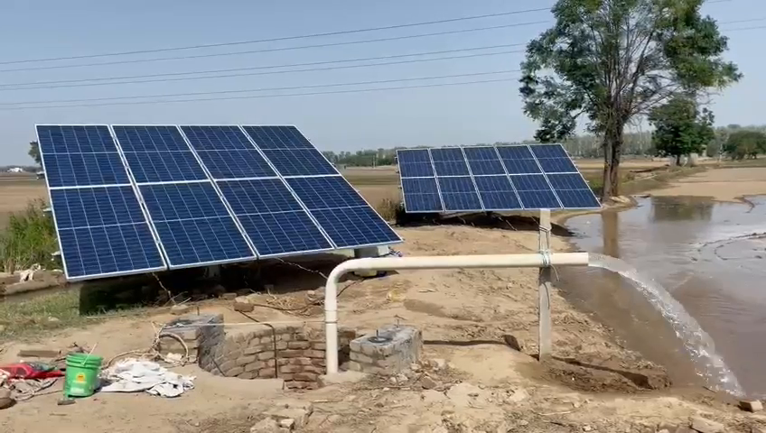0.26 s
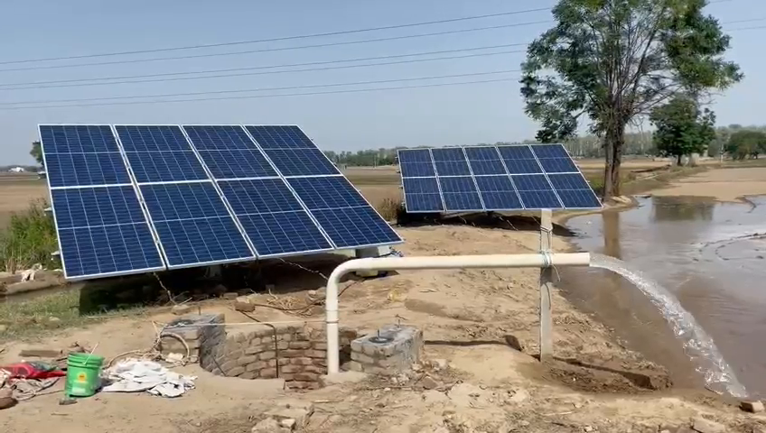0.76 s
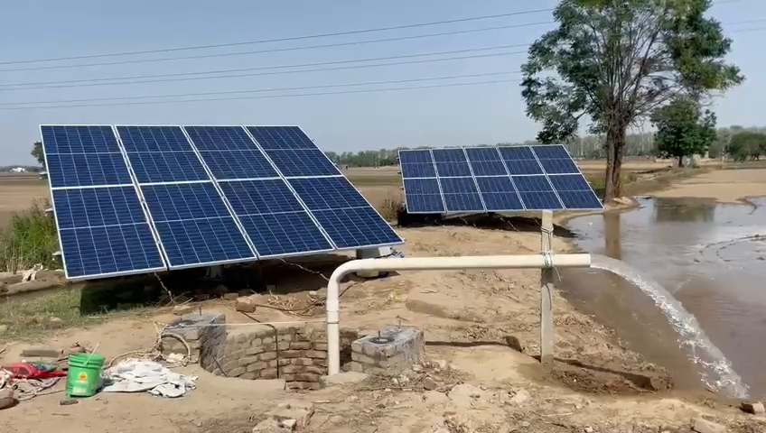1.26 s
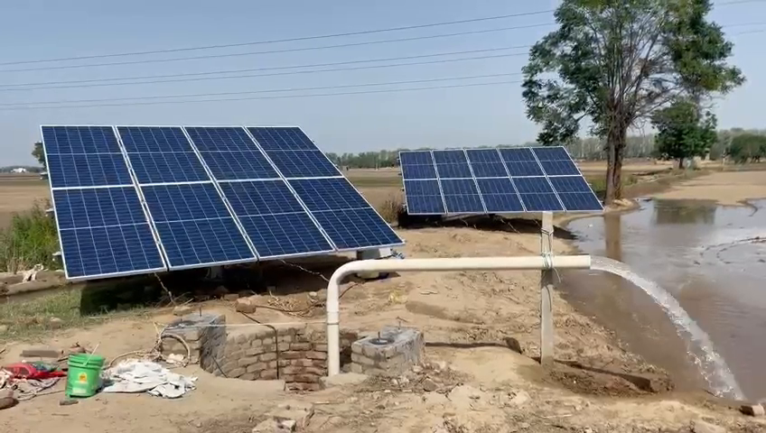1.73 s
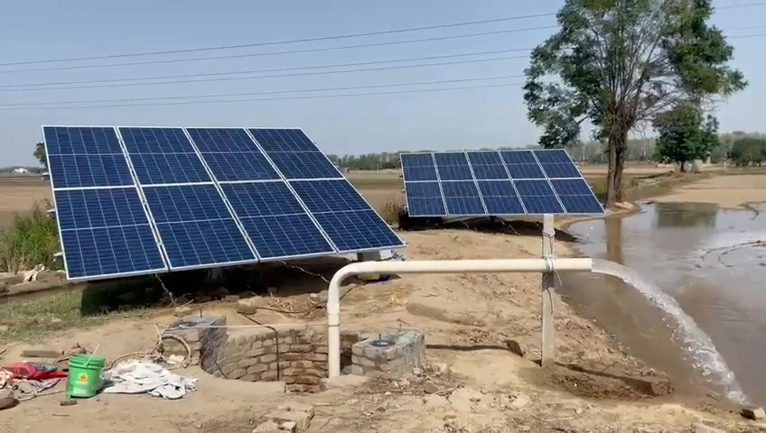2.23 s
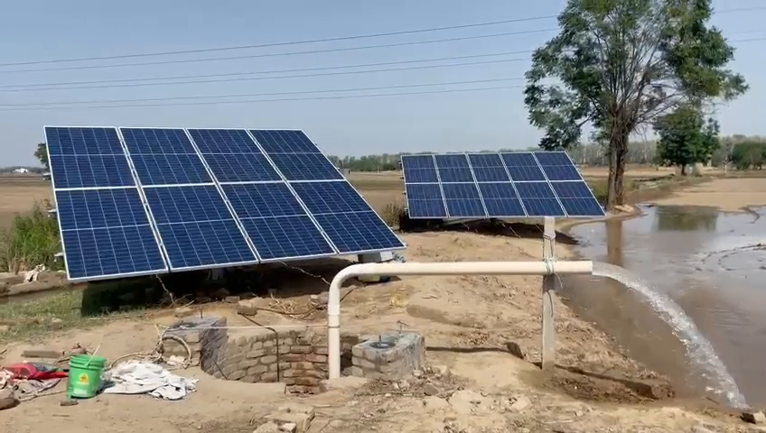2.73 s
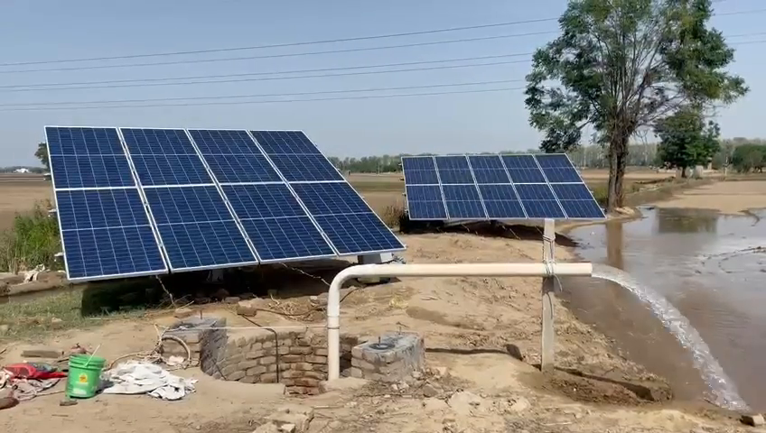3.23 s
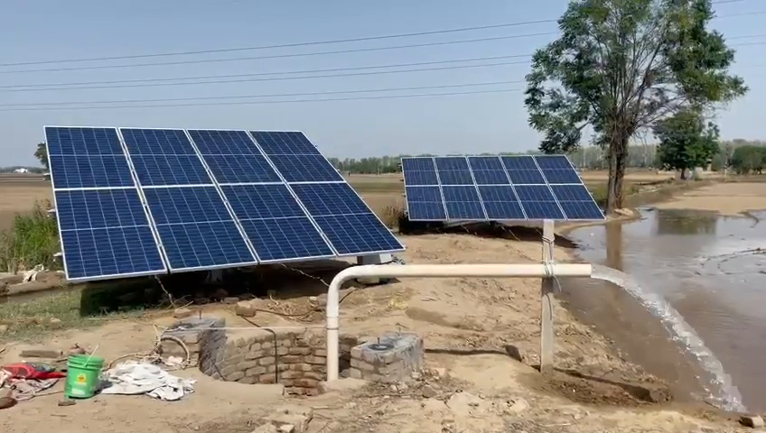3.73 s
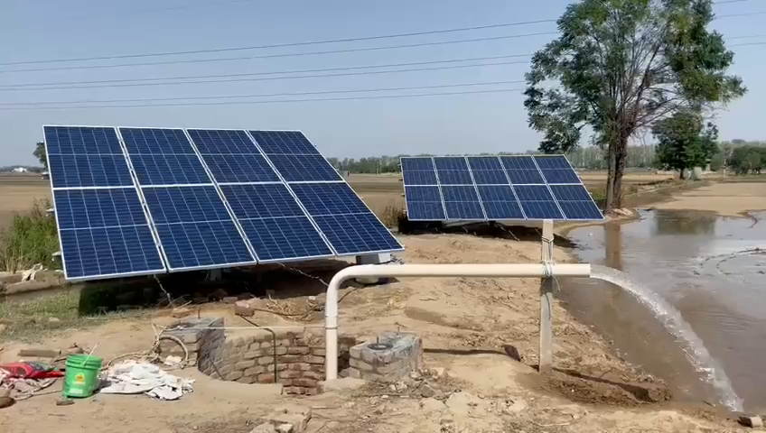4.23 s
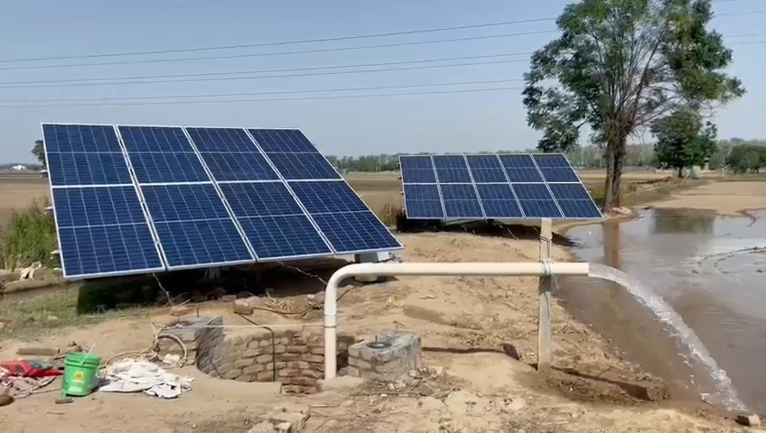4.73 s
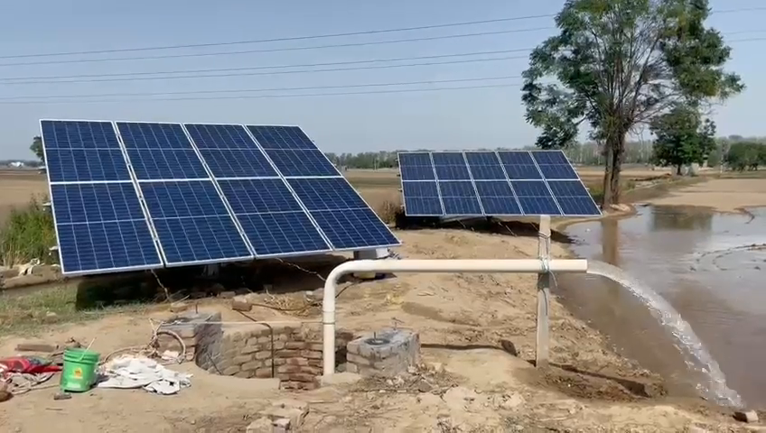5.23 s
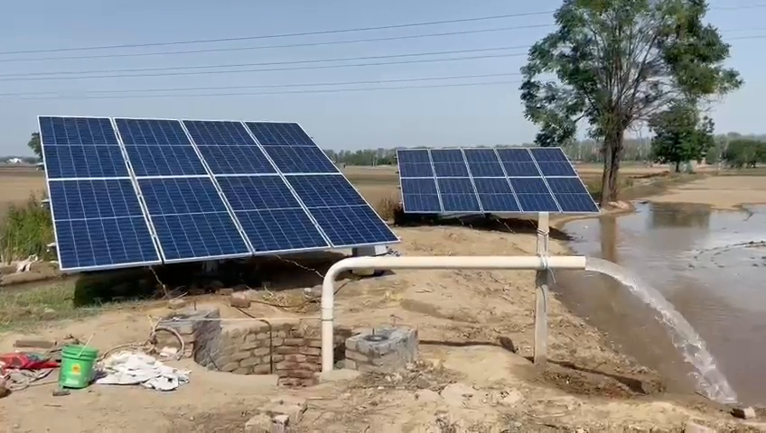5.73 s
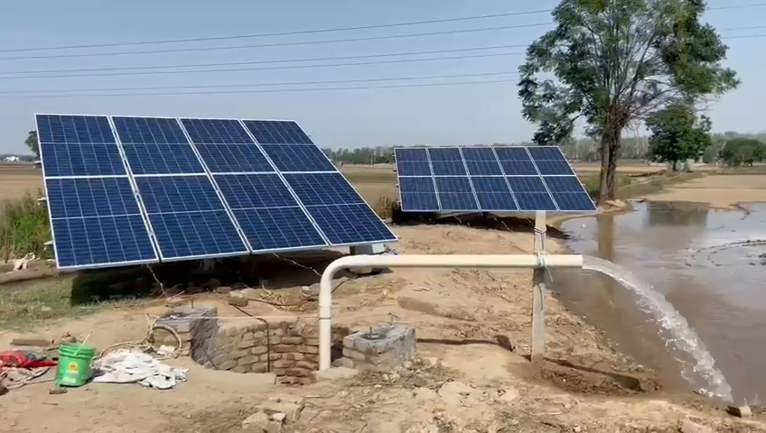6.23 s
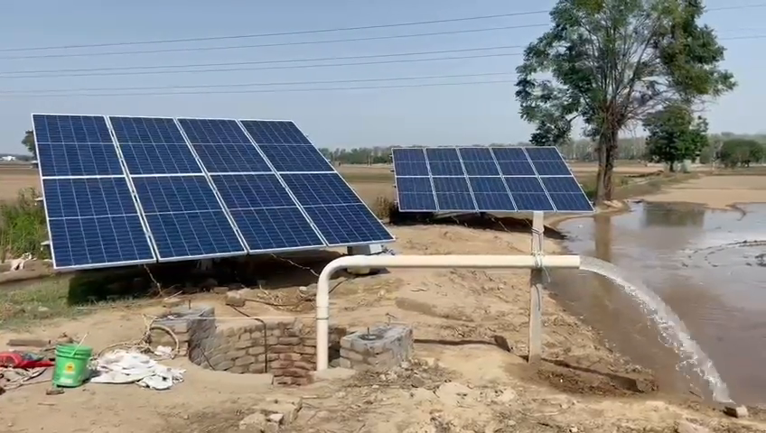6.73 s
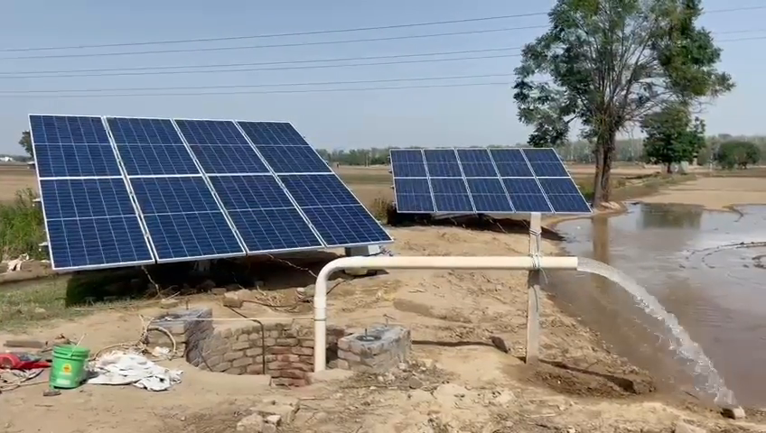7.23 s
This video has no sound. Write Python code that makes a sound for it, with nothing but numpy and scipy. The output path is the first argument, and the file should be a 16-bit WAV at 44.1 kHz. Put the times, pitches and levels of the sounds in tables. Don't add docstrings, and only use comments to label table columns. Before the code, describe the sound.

A thick jet pours continuously from a pump pipe into a shallow flooded field. The plunge is a dense, bubbly rush with white spray, random plops and low gurgles. Wind buffets the phone microphone in low rumbles and dull thumps, lighter around three seconds, busiest near five to six, with a very hard thump just before seven. A very faint high electrical whine hides beneath. Open outdoors, no echoing room, stereo, slightly duller on the right.

```python
import sys
import numpy as np
from scipy import signal
from scipy.fft import rfft, irfft
from scipy.io import wavfile
from scipy.ndimage import uniform_filter1d

SR = 44100
rng = np.random.default_rng(int(sys.argv[2]) if len(sys.argv) > 2 else 0)


def to_wav(sig):
    pcm = np.clip(np.atleast_2d(sig), -1, 1) * 32767
    pcm = np.round(pcm).astype(np.int16)
    wavfile.write(sys.argv[1], SR, pcm.T)


def field_ratio(decibels):
    return 10 ** (np.asarray(decibels, dtype=float) / 20)


N = 329427
T = np.arange(N) / SR
HZ = np.fft.rfftfreq(N, 1 / SR)

# (pitch [Hz], left level [dB], right level [dB])
DRIVE_TONES = [(3788.5, -73, -85), (3826.2, -74, -84), (3960.8, -77, -84), (4038.8, -72, -75),
               (4116.9, -70, -74), (4194.9, -75, -80), (7389.9, -76, -78), (7922.3, -70, -70),
               (8000, -59, -59), (8233.8, -78, -78), (8532.5, -77, -77), (8610.6, -83, -83)]

# (time [s], level [dB])
GUST = [(0, -36.5), (.3, -48), (.9, -47), (1.3, -41.5), (1.8, -41), (2.2, -41), (2.55, -51.5), (3.2, -42),
        (3.95, -46.5), (4.45, -39.5), (4.86, -44), (4.95, -32), (5.4, -41.5), (5.9, -38.5), (6.3, -45),
        (6.8, -40), (7.25, -40.5), (7.47, -36.5)]
# (frequency [Hz], density [dB per Hz])
LOW_WIND = [(15, -33), (32, -9), (58, 2.5), (100, -1), (140, -6), (250, -62), (400, -100)]
HIGH_WIND = [(60, -22), (120, -4.5), (170, -2), (300, -10.5), (450, -10), (800, -51.5)]
EDDY_WIND = [(20, -14), (60, -1.5), (120, 4), (280, 0.5), (450, -11), (800, -44.5)]
# (middle [s], peak [dB], length [s])
SWIRLS = [(0.665, -40, 0.2), (2.63, -41, 0.33), (4.65, -41.5, 0.23), (5.127, -44, 0.081),
          (5.385, -46, 0.088), (1.406, -51, 0.16), (3.798, -47.5, 0.45), (4.335, -42.5, 0.066),
          (5.85, -49, 0.25), (7.406, -47, 0.066), (6.48, -42, 0.13), (6.873, -44.5, 0.27)]
# (middle [s], peak [dB], length
# [s], pitch [Hz])
SURGES = [(0.036, -31.5, 0.026, 84), (1.455, -28.5, 0.012, 71.2), (1.492, -23, 0.017, 73.6),
          (1.565, -31, 0.016, 76.1), (1.599, -28.5, 0.011, 76), (1.742, -26, 0.012, 78.8),
          (1.777, -26.5, 0.054, 82), (2.032, -30.5, 0.018, 83), (2.116, -28.5, 0.036, 64.8),
          (2.185, -30, 0.019, 90), (2.41, -34, 0.032, 101.7), (3.14, -32.5, 0.027, 85),
          (3.217, -30.5, 0.019, 93), (3.409, -34.5, 0.042, 91.3), (3.824, -25, 0.014, 86),
          (4.076, -30.5, 0.02, 106), (4.39, -34, 0.014, 95), (4.459, -29.5, 0.05, 73.3),
          (4.643, -38, 0.02, 104.7), (4.758, -35, 0.011, 86.6), (4.798, -30.5, 0.028, 80.5),
          (4.897, -35, 0.01, 115.5), (4.946, -22.5, 0.033, 80.1), (5.015, -25.5, 0.021, 64.2),
          (5.096, -29, 0.013, 82), (5.137, -27, 0.022, 80.8), (5.17, -30, 0.009, 89.4),
          (5.286, -42, 0.03, 75), (5.33, -23.5, 0.012, 83.5), (5.391, -21.5, 0.028, 93),
          (5.439, -28, 0.012, 104), (5.477, -31.5, 0.01, 110.7), (5.525, -25, 0.02, 66.5),
          (5.603, -28, 0.024, 73.4), (5.656, -34, 0.008, 85.3), (5.695, -30, 0.045, 64),
          (5.746, -31, 0.035, 66.6), (5.819, -27, 0.021, 84.9), (5.886, -40, 0.014, 121),
          (5.944, -33, 0.012, 87.3), (6.684, -30, 0.015, 75), (6.771, -27.5, 0.014, 86),
          (6.831, -22, 0.027, 76.4), (6.894, -26, 0.014, 82.5), (6.983, -31.5, 0.026, 105.4),
          (7.03, -34, 0.031, 72), (7.11, -33, 0.014, 65.8), (7.153, -29, 0.014, 94),
          (7.362, -40, 0.015, 85.4), (7.389, -24, 0.022, 89.8),
          (0.625, -40, 0.02, 84.8), (0.683, -37, 0.028, 79.6), (1.67, -31, 0.021, 83),
          (2.34, -35, 0.02, 71), (3.026, -37.5, 0.041, 75), (4.162, -36.5, 0.048, 70), (6.01, -35, .04, 70),
          (6.141, -31, .04, 70.2), (6.53, -32.5, 0.027, 83.8), (5.23, -34, 0.053, 74.6)]
# (time [s], peak [dB], pitch [Hz])
THUMPS = [(0.023, -24.5, 157), (0.105, -34, 410), (0.259, -32, 155), (0.334, -27, 380), (0.609, -32, 202),
          (0.828, -31, 272), (0.89, -27.5, 444), (1.161, -29, 196), (1.292, -26, 212), (1.373, -27.5, 218),
          (1.434, -21, 172), (1.474, -21.5, 140), (1.757, -21.5, 248), (1.783, -23, 190),
          (1.558, -26.5, 230), (1.954, -21, 356), (2.167, -27, 101), (2.382, -19.5, 287),
          (2.52, -31.5, 340), (2.64, -29.5, 140), (2.818, -26, 430), (3.125, -35, 122), (3.188, -31, 136),
          (3.254, -27, 168), (3.395, -28, 101), (3.461, -49, 243), (3.657, -25, 133), (3.695, -34, 223),
          (3.966, -29, 345), (4.256, -27.5, 205), (4.568, -27.5, 218), (3.806, -33, 102), (4.062, -51, 109),
          (4.439, -26.5, 140), (4.732, -25, 157), (4.924, -18, 201), (4.961, -43, 151), (5.029, -57, 193),
          (5.12, -48, 130), (5.165, -23.5, 150), (5.5, -36, 140), (5.643, -41, 129), (5.866, -25.5, 169),
          (6.064, -32, 184), (6.5, -27, 155), (6.89, -33, 122), (7.114, -32, 251), (5.336, -22.5, 136),
          (5.378, -16, 105), (5.718, -33, 175), (5.918, -23, 143), (6.163, -21, 252), (6.241, -22.5, 244),
          (6.804, -13, 168.5), (6.971, -26.5, 118), (7.335, -29.5, 102), (7.46, -20.5, 250)]

# (time [s], level [dB])
FLOW = [(0, -45.5), (.15, -44), (.55, -43), (1.1, -43.5), (1.6, -43.5), (2.3, -44), (2.65, -42.5),
        (2.95, -43), (3.3, -43), (3.7, -42.5), (4.2, -42.5), (4.45, -44), (4.7, -44.5), (4.9, -43.5),
        (5.45, -44), (5.95, -43), (6.3, -43), (7.47, -43)]
# (middle [s], gain over the flow [dB], length [s])
SLUGS = [(0.552, 1, 0.04), (0.782, 2, 0.058), (1.8, 0.5, 0.16), (2, 2, 0.016), (2.12, 1.5, 0.039),
         (2.332, 2.5, 0.11), (2.626, 3, 0.018), (2.768, 0.5, 0.093), (3.12, 1, 0.043), (3.62, 1, 0.11),
         (3.85, -0.5, .04), (4.555, 2, 0.059), (4.741, 3, 0.11), (5.976, 3.5, 0.043), (7.009, 1.5, 0.099),
         (7.441, 1.5, 0.018)]
# (time [s], peak [dB], pitch [Hz])
PLOPS = [(0.263, -37, 1180), (0.333, -28, 680), (0.515, -30, 824), (0.527, -24, 2960), (0.793, -35, 760),
         (0.876, -30, 1100), (1.064, -27, 780), (1.286, -25, 744), (1.421, -28, 910), (2.26, -30, 1080),
         (3.15, -25, 1640), (3.223, -26, 770), (3.612, -29, 2800), (3.667, -24, 820), (4.301, -38, 1080),
         (4.718, -27, 950), (5.539, -31, 820), (6.312, -33, 1026), (6.874, -26, 750), (6.964, -26, 900),
         (1.787, -25, 1040), (1.91, -30, 1040), (1.999, -23.5, 2170), (2.132, -21.5, 1435),
         (2.285, -33, 795), (2.617, -39, 740), (2.759, -54, 770), (3.715, -21.5, 1470),
         (3.853, -21.5, 1410), (3.921, -37, 880), (4.26, -41, 780), (4.577, -31, 1320),
         (4.964, -27.5, 1100), (5.313, -25.5, 1100), (5.898, -27, 1440), (5.989, -40, 710),
         (6.552, -31, 995), (7.435, -19, 2000), (7.438, -17, 2030), (7.442, -21, 2210),
         (7.451, -24.5, 1920)]
# (time [s], peak [dB],
# pitch [Hz])
GURGLES = [(0.054, -33, 505), (0.104, -21.5, 400), (0.142, -41, 436), (0.214, -29, 395), (0.259, -25, 340),
           (0.336, -23.5, 363), (0.561, -27, 431), (0.733, -36, 436), (0.783, -25, 458), (0.891, -30, 447),
           (0.96, -35, 450), (1.195, -38, 439), (1.477, -25, 313), (1.558, -40, 310), (1.757, -26.5, 323),
           (1.954, -28.5, 343), (2.143, -37, 428), (2.385, -24.5, 301), (2.522, -29, 330),
           (2.596, -35, 388), (2.698, -50, 342), (2.727, -32, 330), (2.822, -23.5, 444), (2.926, -32, 365),
           (2.979, -25.5, 392), (3.037, -26, 377), (3.213, -45, 345), (3.253, -33, 360), (3.463, -37, 326),
           (3.669, -51, 457), (3.832, -31, 446), (3.967, -27, 347), (4.104, -28, 356), (4.139, -31, 355),
           (4.217, -26, 367), (4.305, -22.5, 374), (4.449, -35, 331), (4.483, -23.5, 358),
           (4.536, -34, 410), (4.571, -27, 417), (4.924, -32, 304), (4.963, -40, 366), (5.246, -34, 420),
           (5.377, -29, 444), (5.468, -30, 430), (5.552, -27, 388), (5.679, -38, 417), (5.799, -48, 463),
           (6.018, -45, 334), (6.165, -31.5, 310), (6.245, -44, 306), (6.539, -25, 302), (6.601, -31, 336),
           (6.718, -26, 385), (6.801, -24, 360), (6.86, -31, 304), (6.892, -28, 370), (6.974, -29, 312),
           (7.113, -44, 312), (7.346, -26, 303),
           (0.226, -29, 1060), (0.389, -30, 1060), (0.649, -36, 700), (0.762, -29.5, 680), (1.829, -26, 880),
         (1.934, -43, 646), (1.959, -39, 750), (2.169, -46, 1160), (2.439, -30, 750), (3.386, -31.5, 740),
         (3.579, -31.5, 670), (3.941, -35, 850), (4.446, -26, 767), (4.679, -28, 850), (4.924, -29, 767),
         (5.962, -33, 972), (6.289, -36, 820), (6.559, -34, 740), (6.629, -41, 790), (6.989, -37, 805),
         (7.181, -29, 940), (7.442, -41, 2130)]
# (frequency [Hz], density [dB per Hz])
LEFT_PORT = [(200, 3), (480, -1), (580, -6.5), (800, -8), (1500, -10), (1760, -15), (2100, -9),
             (2950, -14.5), (4600, -17.5), (5700, -22), (6700, -17.5), (7400, -22.5), (9500, -27.5),
             (10200, -28.5), (11600, -30.5)]
# (frequency [Hz], left over right [dB])
SHADE = [(300, .5), (580, .9), (860, -4.8), (1300, 2.1), (1700, 1.2), (1880, -3.6), (2200, 13), (2450, 3.4),
         (2700, 11), (2900, 8), (3100, 13), (3600, 7.4), (4600, 2.3), (5300, 2)]
# (frequency [Hz], likeness [0-1])
SAME = [(300, .92), (500, .8), (800, .8), (1100, .97), (1700, .7), (2000, .94), (2200, .3), (2450, .83),
        (3100, .35), (3350, .6), (4100, .3), (4500, .85), (5000, .75), (6000, .93), (11000, .93)]
# (frequency [Hz], lead [turns])
LEAD = [(200, .02), (700, .14), (1100, 0), (1320, .1), (1600, .11), (1750, .15), (2150, .02), (2340, .5),
        (3850, -1.42), (4300, -1.95), (4750, -2.1), (5000, -2.09), (5800, -2), (8400, -1.5), (11200, -1)]

# (frequency [Hz], threshold [dB])
DROP = [(100, -15), (300, -9), (1100, -13.5), (2500, -20.5), (4000, -11), (5400, -8), (6700, -0.5),
        (8500, -3), (9500, -2.5), (10500, 1)]
# (frequency [Hz], step [dB])
STEP = [(200, -24), (800, -19), (1600, -13), (3000, -22), (5200, -10), (6600, -8), (7400, -2), (9800, 2.5),
        (11500, 4.5)]
# (frequency [Hz], share [0-1])
HOLES = [(2500, 0), (4000, .04), (6500, .02), (7300, .1), (9700, .2), (10200, .3), (10600, .07),
         (11800, .08)]
GAP_HZ = (7560, 8270, 8950)
SPARED_S = ([.59, .69, 1.27, 3.13, 3.85, 4.16, 4.2, 4.45, 5.82, 6.82], [.13, .59, 1.46, 2.05, 3.57, 4.05,
            4.12, 5.29, 5.93, 6.1, 7.03])
# (middle [s], depth [dB], length [s])
STARVED = [
    (0.714, -13, 0.053),
    (2.436, -8, 0.11),
    (4.68, -4.5, 0.071),
    (7.228, -6.5, 0.1),
]
STARVED_HZ = (140, 570)
# (middle [s], length [s], from [Hz], to [Hz])
NARROWED = [(.33, .24, 190, 380), (.9, .09, 170, 370), (1.22, .32, 262, 408), (5.55, .12, 267, 370)]


def evened(x):
    return x / np.sqrt(np.mean(x ** 2) + 1e-20)


def read(points, hz):
    f, value = np.transpose(points)
    return np.interp(np.log(hz + 1), np.log(f + 1), value)


def curve(rows, axis):
    rows = np.asarray(rows)
    return np.interp(T, rows[:, 0], rows[:, axis])


def coloured(x, points):
    return evened(irfft(rfft(x) * field_ratio(read(points, HZ)), N))


def wander(lo_hz, hi_hz):
    z = rfft(rng.standard_normal(N))
    return evened(irfft(z * (HZ > lo_hz) / (1 + (HZ / hi_hz) ** 2), N))


def around(s, reach_s):
    return slice(max(round((s - reach_s) * SR), 0), round((s + reach_s) * SR))


def hump(s, length_s):
    out, near = np.zeros(N), around(s, 2 * length_s)
    out[near] = np.exp(-(2 * (T[near] - s) / length_s) ** 2)
    return out


def add(mix, s, sound):
    part = mix[round(s * SR):][:len(sound)]
    part += sound[:len(part)]


def drive():
    hz, left_db, right_db = np.transpose(DRIVE_TONES)
    start_turns = rng.random((len(hz), 1))
    tones = np.sqrt(2) * np.sin(2 * np.pi * (hz[:, None] * T + start_turns))
    return np.array([field_ratio(left_db) @ tones, -field_ratio(right_db) @ tones])


def buffet(points, lumpy_db, lump_hz):
    lumps = np.tanh(wander(3.0, lump_hz) / 2.9)
    return coloured(rng.standard_normal(N) * field_ratio(3.1 * lumpy_db * lumps), points)


def surges():
    stretch, least_s, level_db = 1.2, 0.028, -2
    rock_ratio = 0.86
    stir = buffet(HIGH_WIND, lumpy_db=6.5, lump_hz=38.5) * field_ratio(-6.5)
    out = np.zeros(N)
    for (s, db, length_s, hz), turn in zip(SURGES, rng.random(60)):
        near = around(s, 0.2)
        shape = np.exp(-(2 * (T[near] - s) / max(stretch * length_s, least_s)) ** 2)
        rock = np.sin(2 * np.pi * (rock_ratio * hz * T[near] + turn))
        out[near] += field_ratio(db + level_db) * shape * (rock + stir[near])
    return out


def thumps():
    rise_cycles, ring_cycles, fall_cycles = 0.72, 1.9, 2.48
    out, t = np.zeros(N), np.arange(4000) / SR
    for s, db, hz in THUMPS:
        sweep_hz = 62 + (1.52 * hz - 62) * np.exp(-t * hz / fall_cycles)
        shape = np.minimum(t * hz / rise_cycles, 1) * np.exp(-t * hz / ring_cycles)
        add(out, s, field_ratio(db + 0.5) * np.sin(2 * np.pi * np.cumsum(sweep_hz) / SR) * shape)
    return out


def wind():
    gust_db = curve(GUST, axis=1)
    mean_db = gust_db.mean()
    sharp_db = mean_db - 2 + 0.47 * (gust_db - mean_db)
    common = field_ratio(gust_db - 1.5) * buffet(LOW_WIND, lumpy_db=3.0, lump_hz=30.5)
    common += field_ratio(sharp_db) * buffet(HIGH_WIND, lumpy_db=2.5, lump_hz=25.2)
    swirls = sum(field_ratio(db) * hump(s, length_s) for s, db, length_s in SWIRLS)
    eddy = (field_ratio(gust_db - 9) + swirls) * buffet(EDDY_WIND, lumpy_db=1.5, lump_hz=30)
    most = 0.15
    pushes = most * np.tanh((surges() + thumps()) / most)
    apart_db, apart_s = -13, 0.004
    eddy += field_ratio(apart_db) * np.roll(pushes, round(apart_s * SR))
    return common + pushes + np.array([eddy, -eddy])


def bubbles(slosh_db):
    per_s, size_db, cycles, rise, count = 10000, 0.5, 4.89, 0.307, 30
    size = field_ratio(size_db * np.minimum(rng.exponential(1, N), 4)) * (rng.random(N) < per_s / SR)
    kind, out = rng.integers(0, count, N), np.zeros(N)
    pitches_hz = np.geomspace(200, 11500, count)
    size *= field_ratio(slosh_db / (1 + (1900 / pitches_hz[kind]) ** 2))
    size *= rng.random(N) < np.sqrt(pitches_hz[kind] / pitches_hz[-1])
    for k, hz in enumerate(pitches_hz):
        turns = cycles * (3 if k % 3 == 0 else 1)
        u = np.arange(0, 3, hz / turns / SR)
        chirp = np.sin(2 * np.pi * turns * u * (1 + rise * cycles / turns * u / 3))
        ring = chirp * u ** .5 * np.exp(-2 * u)
        out += signal.oaconvolve(size * (kind == k), ring * hz ** 0.32 / np.linalg.norm(ring))[:N]
    z = rfft(out)
    fine, broad = (uniform_filter1d(abs(z) ** 2, size=bins) for bins in (900, 6000))
    return evened(irfft(z * np.sqrt(abs(broad / fine)), N))


def spray():
    a, b, patches = rng.standard_normal((N // 128 + 6, 257, 3)).T
    patches = uniform_filter1d(patches, size=9, axis=0)
    patches = evened(uniform_filter1d(patches, size=12, axis=1))
    patchy_db = 2.5 * patches
    return evened(signal.istft((a + 1j * b) * field_ratio(patchy_db), nperseg=512, noverlap=384)[1][:N])


def plops():
    rise_s, fall_s = 0.0015, 0.0044
    out, t = np.zeros(N), np.arange(1200) / SR
    for s, db, hz in PLOPS:
        rough = uniform_filter1d(rng.standard_normal(len(t)), size=4)
        burst = np.sin(2 * np.pi * hz * t * (1 + 14 * t)) + 0.99 * rough
        add(out, s, field_ratio(db - 6.0) * burst * np.minimum(t / rise_s, 1) * np.exp(-t / fall_s))
    return out


def gurgles():
    level_db, cycles, rise = -4, 2.6, 0.1
    out = np.zeros(N)
    for s, db, hz in GURGLES:
        u = np.arange(0, 4, hz / cycles / SR)
        ring = np.sin(2 * np.pi * cycles * u * (1 + rise * (u - 1)))
        add(out, s, field_ratio(db + level_db) * ring * 4 * u * np.exp(-2 * u))
    return out


def water():
    slosh_db = 1.6 * wander(3.8, 32.0) + 1.5 * wander(15, 38)
    plunges = [0.64 * bubbles(slosh_db) + 0.74 * spray() * field_ratio(0.27 * slosh_db) for _ in range(2)]
    slug_db = sum(db * hump(s, length_s) for s, db, length_s in SLUGS)
    flow_db = curve(FLOW, axis=1) + slug_db
    colour = field_ratio(read(LEFT_PORT, HZ)) / (1 + (230 / (HZ + 1)) ** 3) / (1 + (HZ / 11780) ** 70)
    colour *= field_ratio(-2 * np.exp(-((HZ - 3900) / 200) ** 2))
    top = 1 / (1 + (3000 / (HZ + 1)) ** 4)
    parts = []
    for x in plunges:
        z = rfft(x) * colour
        body = irfft(z * (1 - top), N) * field_ratio(0.3 * slug_db)
        fizz = irfft(z * top, N) * field_ratio(0.98 * (flow_db - flow_db.mean()))
        parts.append(body + fizz)
    band = signal.butter(2, [700, 3000], "band", fs=SR, output="sos")
    level = field_ratio(flow_db + 0.5) / np.std(signal.sosfilt(band, parts[0]))
    left = parts[0] * level + plops() + gurgles()
    other = parts[1] * level
    same = np.clip(read(SAME, HZ), 0, 1)
    lead = np.exp(2j * np.pi * np.interp(HZ, *np.transpose(LEAD)))
    right = same * rfft(left) * lead + np.sqrt(1 - same ** 2) * rfft(other)
    return np.array([left, irfft(right / field_ratio(read(SHADE, HZ)), N)])


def scene():
    return drive() + wind() + water()


def sum_and_difference(dry):
    frame, first, bins = 1024, 275, 600
    window = signal.windows.kaiser_bessel_derived(2 * frame, 4 * np.pi)
    n = np.arange(2 * frame)
    basis = np.cos(np.pi / frame * np.outer(n + .5 + frame / 2, n[:frame] + .5))
    basis = (window[:, None] * basis * np.sqrt(2 / frame))[:, :bins]
    count, lead = N // frame + 3, frame - first
    x = np.pad([dry[0] + dry[1], dry[0] - dry[1]], ((0, 0), (lead + frame, 3 * frame)))
    x = x[:, :(count + 1) * frame].reshape(2, -1, frame)
    z = np.concatenate([x[:, :-1], x[:, 1:]], axis=2) @ basis
    z = np.pad(z, ((0, 0), (0, 0), (0, frame - bins)))
    t = (np.arange(count) * frame - lead) / SR

    edges = [0]
    while edges[-1] < frame:
        edges.append(edges[-1] + int(np.clip(4 * round(edges[-1] / 36), 4, 12)))
    edges = np.minimum(edges, frame)
    hz = (n[:frame] + .5) * SR / 2 / frame
    width, middle_hz = np.diff(edges), hz[(edges[1:] + edges[:-1]) // 2]
    power = np.add.reduceat(z ** 2, edges[:-1], axis=2) / width
    power = uniform_filter1d(power, size=3, axis=1)
    power = abs(uniform_filter1d(power, size=3, axis=2)) + 1e-20

    waver = uniform_filter1d(1 - rng.exponential(1, power.shape), size=2, axis=1)
    waver_db = 3.5 * evened(uniform_filter1d(waver, size=2, axis=2))
    keep = power > power[::-1] * field_ratio(2 * (read(DROP, middle_hz) + np.minimum(waver_db, 1)))
    for lo_hz, hi_hz, moments_s in zip(GAP_HZ, GAP_HZ[1:], SPARED_S):
        spared = (abs(t[:, None] - moments_s) < .02).any(1)
        keep[0][:, (middle_hz > lo_hz) & (middle_hz < hi_hz)] = spared[:, None]
    keep[0] &= rng.random(keep[0].shape) > read(HOLES, middle_hz)

    step_db = read(STEP, middle_hz) + 2.1 * rng.standard_normal(power.shape)
    step = np.repeat(np.sqrt(power.max(0)) * field_ratio(step_db), width, axis=2)
    rounded = np.floor((abs(z) / step) ** .75 + .4054) ** (4 / 3)
    z = np.sign(z) * step * rounded * np.repeat(keep, width, axis=2)

    starve_db = sum(db * np.exp(-(2 * (t - s) / length_s) ** 2) for s, db, length_s in STARVED)
    z[0][:, (hz > STARVED_HZ[0]) & (hz < STARVED_HZ[1])] *= field_ratio(starve_db)[:, None]
    for s, length_s, lo_hz, hi_hz in NARROWED:
        z[1] *= 1 - np.outer(abs(t - s) < length_s / 2, (hz > lo_hz) & (hz < hi_hz))
    edge_hz = 11770 + 85 * evened(uniform_filter1d(rng.standard_normal(count), size=2))
    z[1][:, hz > 10900] = 0
    back = (z * (hz < edge_hz[:, None]))[..., :bins] @ basis.T
    x = back[:, 1:, :frame] + back[:, :-1, frame:]
    both, apart = x.reshape(2, -1)[:, lead:lead + N] / 2
    return np.array([both + apart, both - apart])


def band_limit(x):
    return signal.sosfilt(signal.butter(12, 12960, fs=SR, output="sos"), x)


def record(dry):
    mix = sum_and_difference(dry)
    return band_limit(mix)


dry = scene()
out = record(dry)
to_wav(out)
```